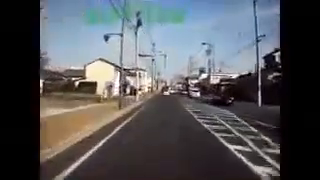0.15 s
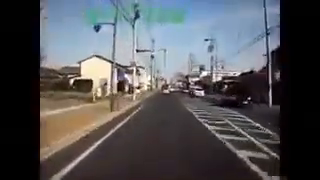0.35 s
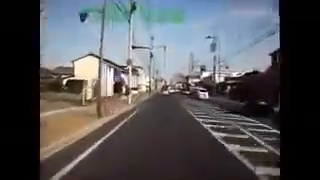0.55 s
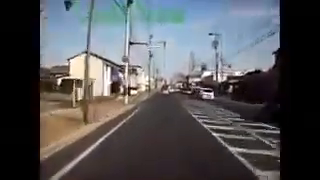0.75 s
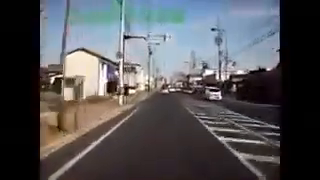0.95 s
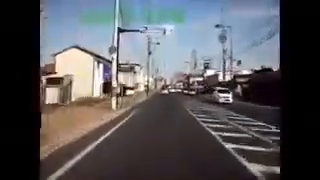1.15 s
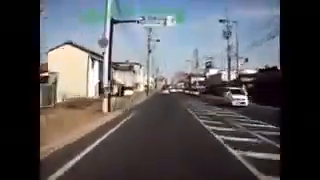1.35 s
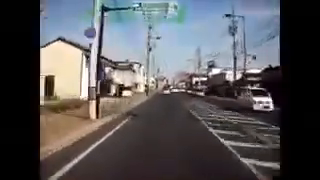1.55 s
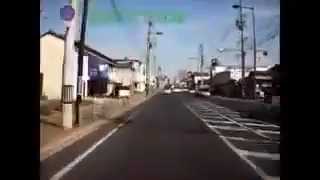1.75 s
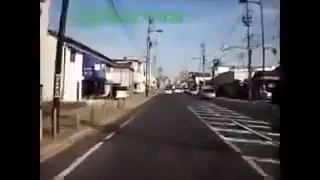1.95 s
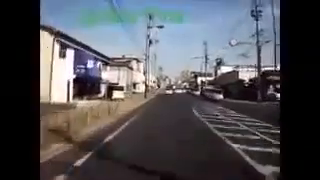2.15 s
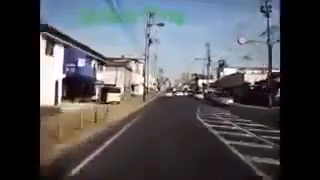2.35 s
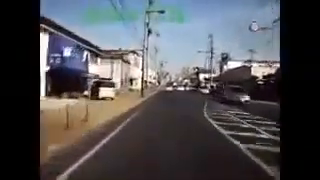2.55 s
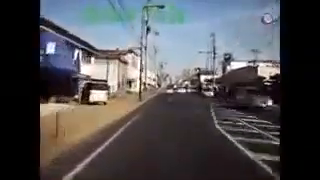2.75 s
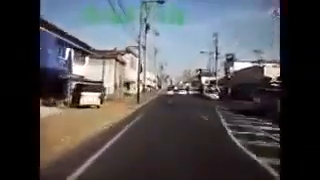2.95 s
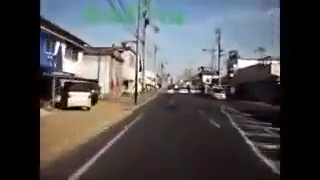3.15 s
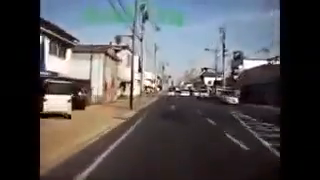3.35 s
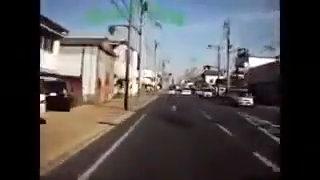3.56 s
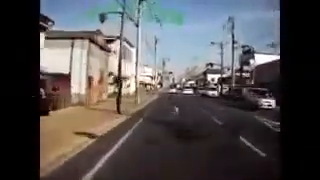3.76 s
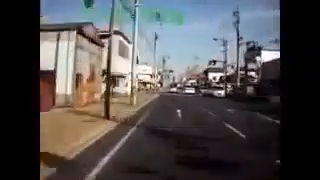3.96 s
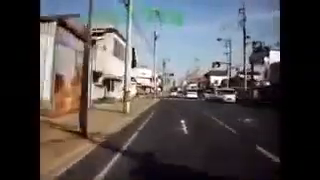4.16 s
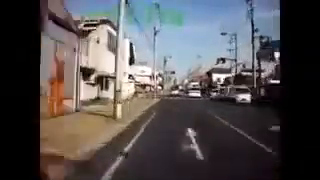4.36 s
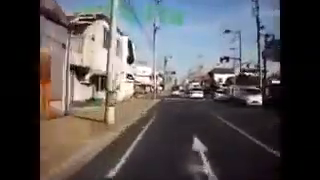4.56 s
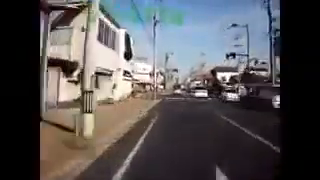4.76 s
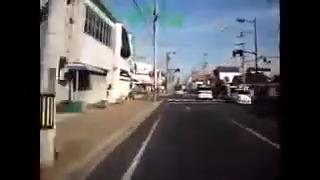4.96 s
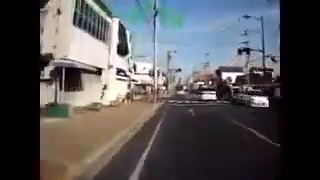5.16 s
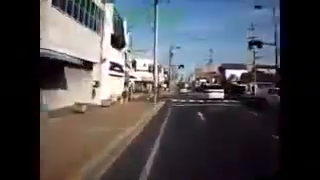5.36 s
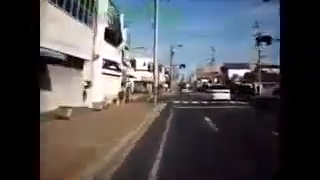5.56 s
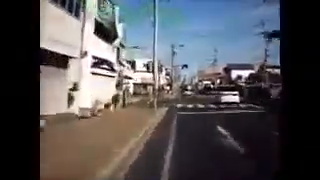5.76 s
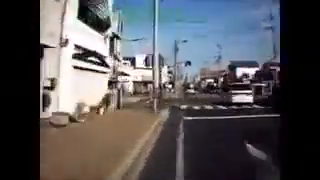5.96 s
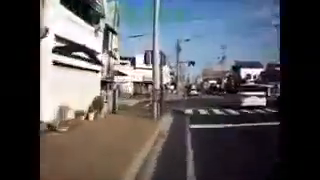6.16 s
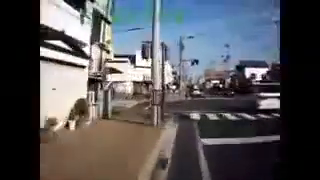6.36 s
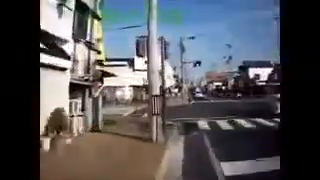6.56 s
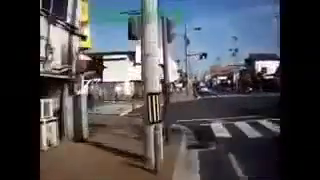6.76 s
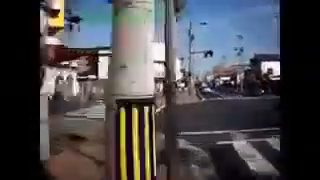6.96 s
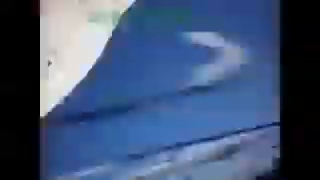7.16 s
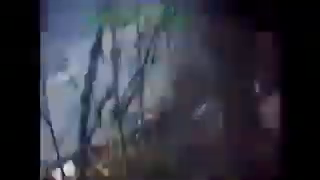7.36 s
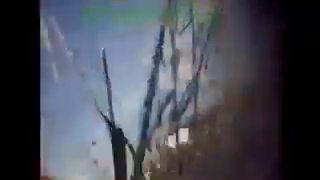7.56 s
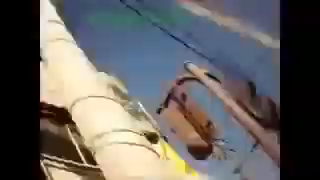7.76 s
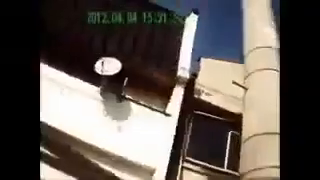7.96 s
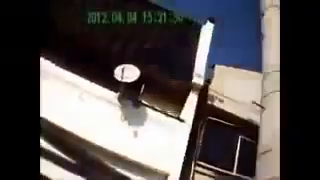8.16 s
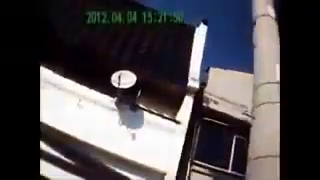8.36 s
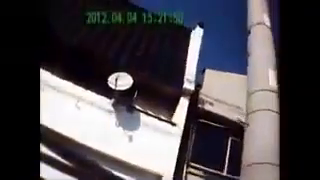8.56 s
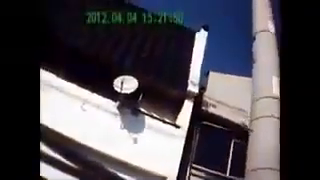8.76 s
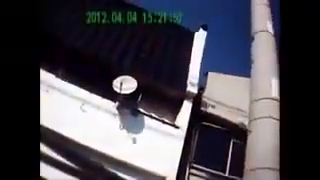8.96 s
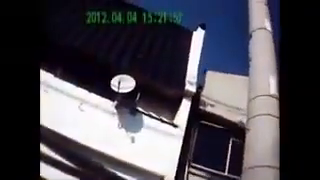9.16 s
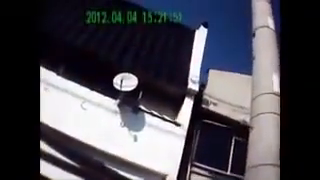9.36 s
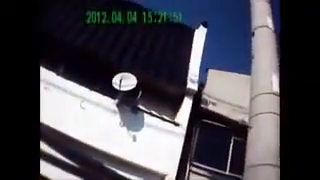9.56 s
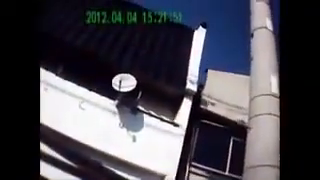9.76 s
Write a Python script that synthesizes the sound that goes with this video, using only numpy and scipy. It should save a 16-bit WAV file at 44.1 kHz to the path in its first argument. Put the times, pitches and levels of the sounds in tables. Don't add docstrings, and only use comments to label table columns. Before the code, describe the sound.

A small, cheap microphone in a moving car picks up a low, boxy road and engine rumble. It is cut off by an abrupt, clipped crash, with deep thuds, crunching sheet metal, sharp cracks and falling glass for about a second and a half. Then come heavy knocks, light metallic tinkles and dropping bits, a last click, and a fading rustle without any engine.

```python
import sys
import numpy as np
from scipy import signal
from scipy.fft import rfft, irfft, dct, next_fast_len
from scipy.io import wavfile
from scipy.ndimage import uniform_filter1d

SR = 44100
rng = np.random.default_rng(int(sys.argv[2]) if len(sys.argv) > 2 else 0)


def how_loud(loudness_db):
    steps = np.asarray(loudness_db, float) / 20
    return 10 ** steps


def wrap_up_sound(samples):
    columns = np.atleast_2d(samples).T
    tamed = np.clip(columns, -1, 1)
    steps = np.round(tamed * 32767).astype(np.int16)
    wavfile.write(sys.argv[1], SR, steps)


N = 436576
T = np.arange(N) / SR
HIT = int(7.2 * SR)


def unit(x):
    return x / np.sqrt(np.mean(x ** 2))


def band(x, hz, width):
    return signal.lfilter(*signal.iirpeak(hz, hz / width, fs=SR), x)


def walk(rate):
    k = int(SR / rate)
    levels = np.repeat(rng.standard_normal(N // k + 1), k)
    return 0.92 * uniform_filter1d(uniform_filter1d(levels, k), k)[:N]


def grit(rate, spread_db, dense):
    size_db = spread_db * np.minimum(rng.exponential(size=N), 3)
    hits = (rng.random(N) < rate / SR) * how_loud(size_db) * rng.standard_normal(N)
    return unit(hits) + dense * rng.standard_normal(N)


def body(x, modes, wander_db, rate):
    out = np.zeros(N)
    for k, (hz, width, db) in enumerate(modes):
        ring = band(band(x[HIT:], hz, width), hz, 2 * width) / np.sqrt(width)
        level = how_loud(db + wander_db * walk(rate))[HIT:]
        out[HIT:] += (-1) ** k * level * ring
    return out / np.sqrt(np.mean(out[HIT:] ** 2))


def surges(events, fall_share):
    out = 0
    for s, db, rise, fall in events:
        before, after = (s - T) / rise, (T - s) / (fall * fall_share)
        out = out + how_loud(db) * np.exp(-np.where(T < s, before, after))
    return out


# (time [s], level [dB])
EXTRA_FORCE = [(7.243, 33.5), (7.32, 0), (7.8, 12.5), (8.6, 6), (8.75, -4), (8.9, 0), (9.2, -2), (9.9, 5.5)]


def extra_force_db(s, before=None):
    return np.interp(s, *np.transpose(EXTRA_FORCE), left=before)


# (time [s], level [dB])
CRUSH = [(7.243, 7.5), (7.309, 6.5), (7.355, -18.5), (7.384, -8), (7.712, -2.5), (8.038, -1.5), (8.66, -4),
         (8.768, -9), (9.212, -20)]
# (time of return [s], level
# change [dB], length [s])
UNSTEADY_CONTACT = [(7.843, -9.5, 0.02), (8.688, -5.5, 0.038), (8.818, -5.5, 0.041), (8.996, -1.5, .02),
                    (9.111, 0.5, .03), (9.178, 0, 0.019), (9.488, 5.5, 0.017)]


def crushing():
    s, db = np.transpose(CRUSH)
    settle_db = -8 * np.maximum(T - s[-1], 0)
    lull_db = 0
    for back, depth_db, length in UNSTEADY_CONTACT:
        sinking = np.clip(1 - (back - T) / length, 0, 1) ** .5
        lull_db = lull_db + depth_db * sinking * (T < back)
    return how_loud(np.interp(T, s, db) + settle_db) * how_loud(lull_db)


# (frequency [Hz], width [Hz], level [dB])
SHELL = [(60, 25, -3.5), (129.5, 50, -2), (193.3, 70, -0.5)]
# (frequency [Hz], width [Hz], level [dB])
PANELS = [(303, 170, 1), (432.3, 140, 1), (600, 220, 2), (779, 250, 0), (1006, 240, 0), (1275, 220, -0.5),
          (1615, 450, -7.5), (2070, 380, -10.5)]
# (frequency [Hz], width [Hz], level [dB])
CRUNCH = [(1435, 350, 8), (2003, 650, 10), (2485, 750, 5.5), (3150, 850, 6)]
# (frequency [Hz], width [Hz], level [dB])
SHARDS = [(3837, 500, -0.5), (4720, 1200, -5.5), (5790, 1200, -3.5), (7900, 3300, -14.5)]
# (time of peak [s], level [dB], rise [s], fall [s])
HEAVES = [
    (7.57, -8, .02, 0.022),
    (7.83, 11.5, 0.015, 0.015),
    (8.04, -2, 0.063, 0.033),
    (8.39, -9, 0.018, .02),
    (8.74, -8.5, 0.021, 0.014),
]
# (time of peak [s], crunch level [dB], rise [s], fall [s])
SHOWERS = [
    (7.35, -4.5, 0.032, 0.26),
    (7.845, -10, 0.00074, 0.033),
    (8.03, -5, 0.053, 0.026),
    (8.27, -7.5, 0.031, 0.014),
    (8.52, -11.5, 0.081, 0.042),
    (8.69, -16.5, 0.0058, 0.012),
]


def wreck():
    start = CRUSH[0][0]
    crush = crushing()
    unrest = np.clip(.3 + extra_force_db(T) / 14, 0, 1)

    boom_fade_db = -28 * np.maximum(T - 9.35, 0)
    boom = np.hypot(crush * how_loud(-11 + boom_fade_db), surges(HEAVES, 0.85))
    crunch = np.hypot(crush * how_loud(-15), surges(SHOWERS, 0.87))
    glass_left_db = 1 - 9.5 * (T - start)
    shards = np.hypot(crush * how_loud(-20.5), surges(SHOWERS, .7) * how_loud(glass_left_db))

    out = body(grit(900, 2.0, 1.5), PANELS, 3.3 * unrest, 9) * how_loud(1.8 * unrest * walk(25)) * crush
    out += body(grit(60, 5.1, 0.61), SHELL, 2.2 * unrest, 7) * how_loud(3.1 * walk(11)) * boom
    out += body(grit(1200, 3.5, 1.1), CRUNCH, 1.4 * unrest, 12) * how_loud(2.4 * walk(30)) * crunch
    out += body(grit(1500, 3.6, 1.1), SHARDS, 1.0 * unrest, 14) * how_loud(0.48 * walk(35)) * shards
    return out * np.clip((T - start) / 0.0071, 0, 1)


def add(out, s, sound):
    i = int(s * SR)
    out[i:i + len(sound)] += sound[:N - i]


def fade(t60, rise):
    t = T[:SR // 2]
    return t, np.exp(-np.log(1000) * t / t60) * (1 - np.exp(-t / rise))


def knocks(events, width_share, rise, tone, crack):
    out = np.zeros(N)
    for s, db, hz, t60 in events:
        t, shape = fade(t60, rise)
        noise = rng.standard_normal(len(t))
        ring = .5 * unit(band(noise, hz, width_share * hz)) + tone * np.sin(2 * np.pi * hz * t)
        add(out, s, how_loud(db) * (ring + crack * noise * shape) * shape)
    return out


# (time [s], peak level [dB], pitch [Hz], decay t60 [s])
THUDS = [(7.242, -4.5, 716, 0.047), (7.803, 12.5, 118, 0.13), (7.841, -1, 389, 0.22),
         (8.719, 7.5, 402, 0.17), (8.819, 5.5, 691, 0.072), (8.949, -17, 712, 0.21),
         (8.997, 10.5, 245, 0.13), (9.07, 1, 249, 0.063), (9.122, -3.5, 227, 0.13),
         (7.246, -0.5, 75.6, 0.22),
    (7.262, 0.5, 150.6, 0.096),
    (7.541, -1, 60, .3),
    (8.859, -17.5, 60, 0.45),
    (8.992, -13, 44.2, 0.36),
]


def thuds():
    return knocks(THUDS, .3, 0.0031, .6, 0.033)


# (time [s], peak level [dB], pitch [Hz])
CRUMPLES = [(7.254, -2, 310.5), (7.269, -1.5, 543), (7.284, 1.5, 261), (7.299, -6.5, 600),
            (7.418, -5, 141.5), (7.519, -5.5, 220), (7.64, -8, 227.5), (7.699, 0, 648), (7.75, 4, 181.7),
            (7.858, 4, 149), (7.887, 1, 172), (7.915, -4, 429), (7.948, -1.5, 165), (8.015, 0, 403),
            (8.059, 2.5, 332), (8.11, 1, 130), (8.155, -1, 615), (8.19, 2.5, 399.5), (8.24, -2, 418),
            (8.31, -5.5, 738), (8.359, -4.5, 651), (8.385, -3, 190.4), (8.498, -1.5, 538), (8.57, -3, 404),
            (8.605, -4, 900), (8.625, -1, 247.6), (8.658, 1, 329)]


def crumples():
    events = [(*c, 0.097) for c in CRUMPLES]
    return how_loud(3) * knocks(events, 0.3, 0.0032, 0.51, 0.02)


# (time [s], peak level [dB], pitch [Hz], decay t60 [s])
FRAME_RINGS = [(7.325, -8.5, 3810, 0.29), (7.38, -11.5, 3940, 0.29), (7.45, -7, 1208, 0.47),
               (7.5, -3, 1165, 0.29), (7.49, -11, 3820, 0.48), (7.55, -7, 3920, 0.26),
               (8.215, -7, 3950, .2), (8.255, -1.5, 1370, 0.13), (9.23, -21, 1246, 1),
               (9.4865, -7.5, 3700, 0.029), (9.4895, -9, 3000, 0.041), (9.492, -12, 1170, 0.11)]


def frame_rings():
    return knocks(FRAME_RINGS, 0.021, 0.001, 0.22, 0)


# (time [s], peak level [dB], pitch [Hz])
CRACKS = [(7.3168, 10, 3640), (7.58, 1, 3780), (7.8415, -2, 2700), (7.8675, -8, 3670), (7.8988, -3.5, 3300),
          (8.1351, 0.5, 5480), (8.272, -6, 3560), (8.4071, -0.5, 2650), (8.4814, -10, 5300),
          (8.749, -1.5, 5800), (8.825, -6.5, 6980), (8.999, -25, 5600), (9.4887, -4, 3050),
          (9.493, -18, 5700)]


def cracks():
    return knocks([(*c, 0.024) for c in CRACKS], .7, .0006, .1, .3)


# (time [s], peak level [dB], pitch [Hz])
DROPS = [(8.819, -9, 1044), (8.94, -16, 1290), (9.022, -10, 669), (9.036, -12.5, 397), (9.18, -20, 326),
         (9.24, -17.5, 410), (9.335, -20.5, 398), (9.405, -17, 235), (9.439, -22, 420)]


def drops():
    return how_loud(2.5) * knocks([(*d, 0.23) for d in DROPS], .15, 0.0036, 0.86, .02)


# (time [s], main mode peak [dB], second mode peak [dB])
BOUNCES = [(8.224, -11.5, -28), (8.4848, -14, -22), (8.6744, -10, -33), (8.743, -10.5, -24),
           (8.759, -1, -24), (8.779, -15.5, -12), (8.8293, -35, -24), (8.87, -24, -31), (8.905, -28, -23),
           (8.9507, -39, -28), (9.0122, -11, -33), (9.046, -20, -33), (9.085, -24.5, -36),
           (9.1726, -31.5, -22), (9.1904, -13, -14.5), (9.384, -40, -35)]
# (frequency [Hz], decay t60 [s])
PART_MODES = [(5570, 0.12), (4740, 0.25), (8150, 0.07), (3840, 0.034)]


def metal_part():
    out = np.zeros(N)
    chances = rng.standard_normal((len(BOUNCES), 8))
    for (s, main_db, second_db), chance in zip(BOUNCES, chances):
        levels = main_db, second_db, main_db - 21, second_db - 8
        free = how_loud(-.5 * extra_force_db(s))
        for db, (hz, t60), detune, split in zip(levels, PART_MODES, chance[:4], chance[4:]):
            t, shape = fade(t60 * free, 0.0019)
            pair = np.sin(2 * np.pi * hz * (1 + 0.00093 * detune) * t)
            pair += 0.36 * np.sin(2 * np.pi * hz * (1 + 0.0074 * split) * t)
            add(out, s, how_loud(db) * shape * pair)
    return out


# (time [s], level [dB])
ROAD = [(0.0, -15), (0.8, -14), (1.6, -14.5), (2.798, -14.5), (5.4, -14.5), (6.2, -15), (6.8, -16),
        (7.2, -13.5)]
# (frequency [Hz], level per Hz [dB])
ROAD_COLOUR = [(15, -45.5), (25, -14), (48, -9), (96, -12.5), (129, -5.5), (168, -6.5), (231, 1.5),
               (386, -3), (447, -6.5), (784, -2.5), (908, -9), (1050, -5.5), (1760, -23), (4670, -43.5),
               (8600, -57), (11200, -91.5), (18900, -120)]
# (frequency [Hz], width [Hz], lift [dB])
CABIN = [(132, 39, 0.5), (227, 20, 0), (389, 48, 2), (755, 120, -3), (799, 12, 3), (1038, 270, 1),
         (1241, 92, 4), (4030, 750, 2.5)]


def road():
    size = next_fast_len(N)
    f = np.maximum(np.fft.rfftfreq(size, 1 / SR), 1)
    hz, db = np.transpose(ROAD_COLOUR)
    lift = sum(g / (1 + ((f - c) / (w / 2)) ** 2) for c, w, g in CABIN)
    colour = how_loud(np.interp(np.log(f), np.log(hz), db) + lift)
    noise = rfft(rng.standard_normal(size)) * colour

    place = 2 * np.log2(f / 25)
    common, out = walk(2.1), 0
    for k in range(18):
        share = np.clip(1 - abs(place - k), 0, 1)
        out = out + irfft(noise * share, size)[:N] * how_loud(1.3 * common + 1.15 * walk(6))
    s, level_db = np.transpose(ROAD)
    stop = np.clip((7.27 - T) / 0.035, 0, 1)
    return unit(out) * how_loud(np.interp(T, s, level_db) + 2.5) * stop


def scene():
    force = how_loud(.5 * extra_force_db(T, before=0))
    hits = thuds() + crumples() + frame_rings() + drops() + cracks() + metal_part()
    return (road() + wreck() + hits * force)[None]


def overload(x):
    leak = 1 / (.04 * SR)
    loud = signal.lfilter([leak], [1, leak - 1], abs(x))
    x = x + 0.56 * np.maximum(loud - 0.5, 0)
    rail, knee = np.where(x > 0, 0.6, 0.41), 3.06
    return x / (1 + abs(x / rail) ** knee) ** (1 / knee)


# (frequency [Hz], step over the band's rms [dB])
COARSE_LONG = [(200, -17), (1500, -12), (4000, -4), (6000, 0), (9000, 7.5)]
# (frequency [Hz], step over the band's rms [dB])
COARSE_SHORT = [(200, -18), (1500, -14), (4000, 0.5), (6000, 2.5), (9000, -2)]


def thrifty_spectrum(x, coarse, gate_db, finest_db, size):
    lead = size + 54
    count = (N + lead) // size + 1
    window = signal.windows.kaiser_bessel_derived(2 * size, 4 * np.pi)
    hops = np.pad(x, (lead, (count + 1) * size - N - lead)).reshape(-1, size)
    a, b, c, d = np.split(np.hstack([hops[:-1], hops[1:]]) * window, 4, axis=1)
    lines = dct(np.hstack([-c[:, ::-1] - d, a - b[:, ::-1]]), type=4, norm="ortho")
    edges = np.r_[0:96:8, 96:240:24, 240:size:32, size]
    frame = np.sqrt(np.mean(lines ** 2, axis=1, keepdims=True))
    luck_db = 6.5 * uniform_filter1d(rng.standard_normal((count, 1)), size=2, axis=0)
    bright = np.sum(np.diff(hops, axis=1) ** 2, axis=1, keepdims=True) + 1e-12
    care_db = -20 * (bright[1:] > 5 * bright[:-1])
    hz, db = np.transpose(coarse)
    for lo, hi in zip(edges[:-1], edges[1:]):
        own = np.sqrt(np.mean(lines[:, lo:hi] ** 2, axis=1, keepdims=True))
        whim_db = 4.5 * rng.standard_normal((2, count, 1))
        coarse_db = np.interp((lo + hi) / 4 * SR / size, hz, db)
        step = own * how_loud(coarse_db + whim_db[0] + care_db)
        step = step + frame * how_loud(finest_db + care_db) + 1e-12
        kept = own > frame * how_loud(gate_db + luck_db + whim_db[1])
        lines[:, lo:hi] = kept * step * np.round(lines[:, lo:hi] / step)
    u, v = np.split(dct(lines, type=4, norm="ortho"), 2, axis=1)
    out = np.zeros_like(hops)
    out[:-1] += np.hstack([v, -v[:, ::-1]]) * window[:size]
    out[1:] += np.hstack([-u[:, ::-1], -u]) * window[size:]
    return out.ravel()[lead:lead + N]


def top_cut(x):
    return signal.sosfilt(signal.butter(12, 10960, fs=SR, output="sos"), x)


def record(dry):
    x = overload(dry)
    x = signal.lfilter(*signal.butter(1, 51.8, "high", fs=SR), x)
    x = signal.sosfilt(signal.ellip(10, .2, 70, 8800, fs=SR, output="sos"), x)
    gate_db = -33.8
    x = thrifty_spectrum(x[0], COARSE_LONG, gate_db - 30, -28, size=2048)
    x = x / (1 + (x / .82) ** 6) ** (1 / 6)
    x = thrifty_spectrum(x, COARSE_SHORT, gate_db, -60, size=1024)
    mix = x[None] - .009
    return top_cut(mix)


dry = scene()
out = record(dry)
wrap_up_sound(out)
```